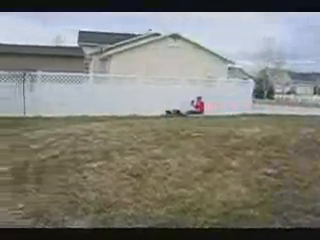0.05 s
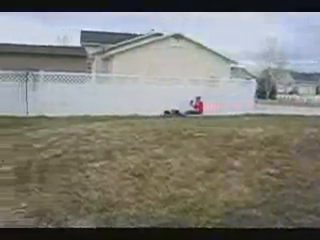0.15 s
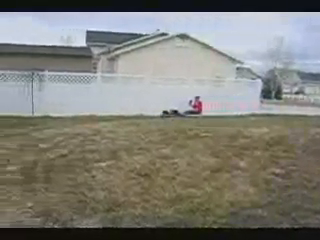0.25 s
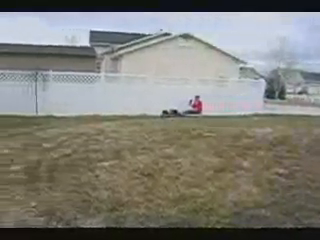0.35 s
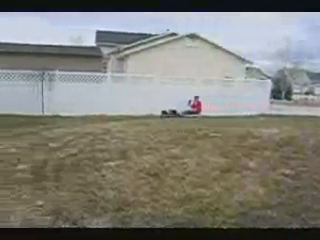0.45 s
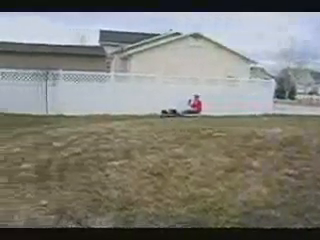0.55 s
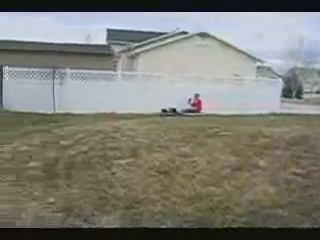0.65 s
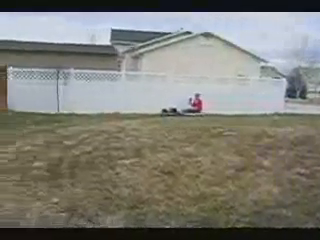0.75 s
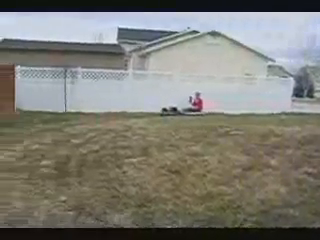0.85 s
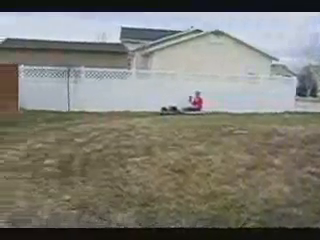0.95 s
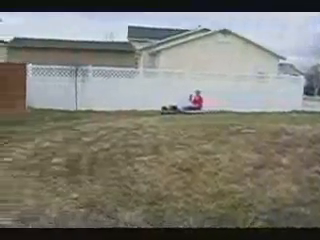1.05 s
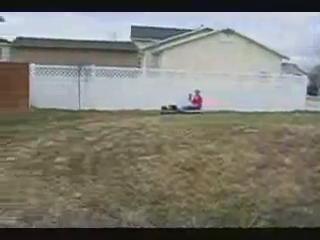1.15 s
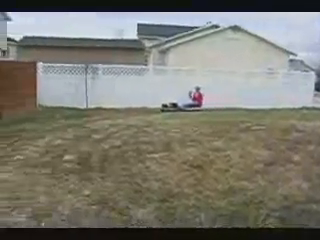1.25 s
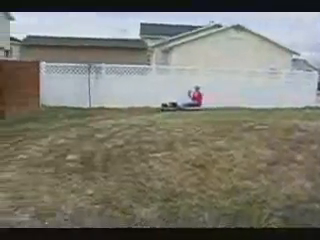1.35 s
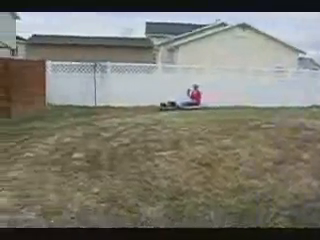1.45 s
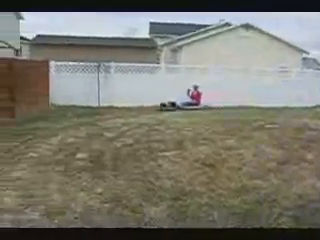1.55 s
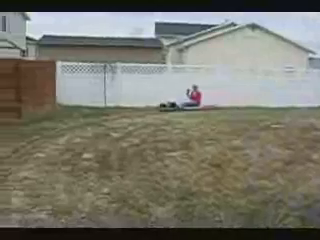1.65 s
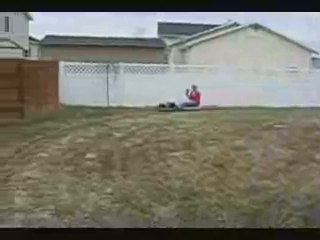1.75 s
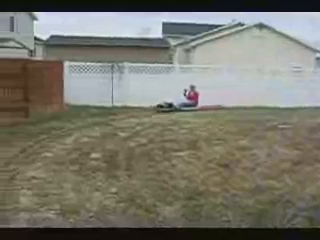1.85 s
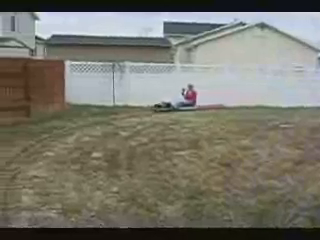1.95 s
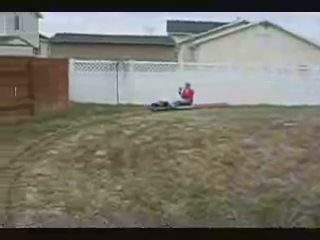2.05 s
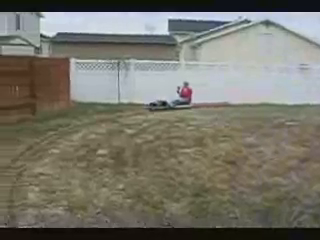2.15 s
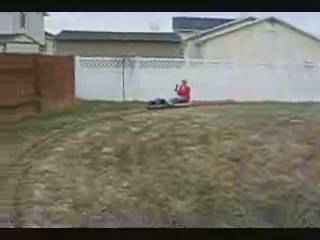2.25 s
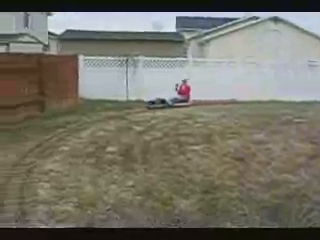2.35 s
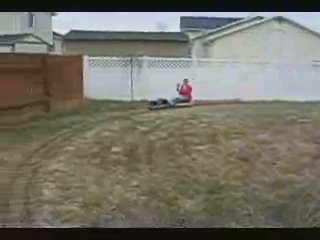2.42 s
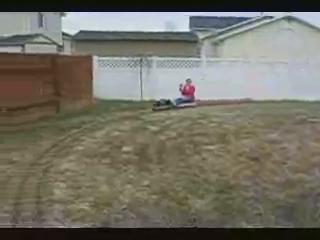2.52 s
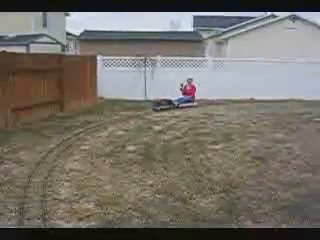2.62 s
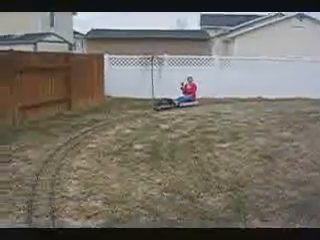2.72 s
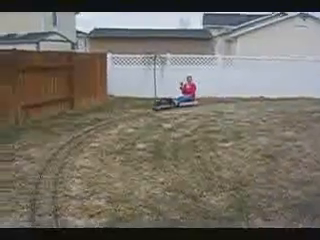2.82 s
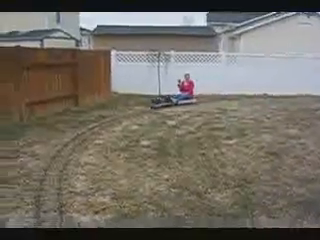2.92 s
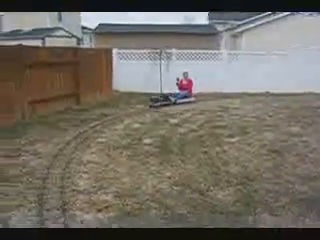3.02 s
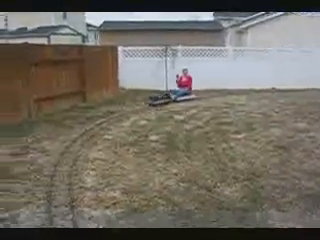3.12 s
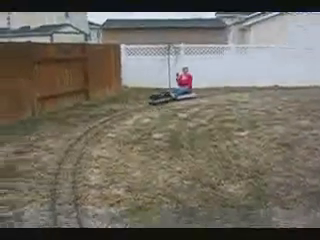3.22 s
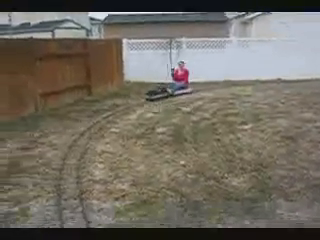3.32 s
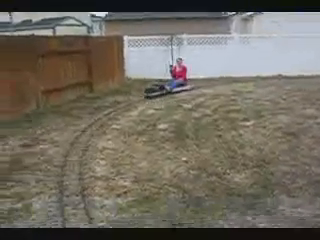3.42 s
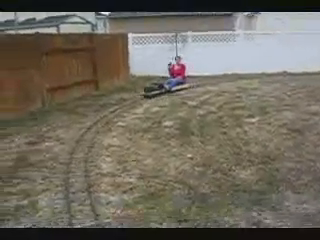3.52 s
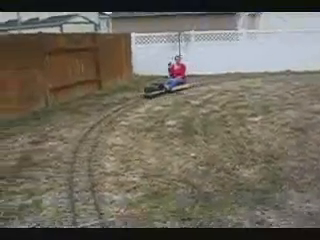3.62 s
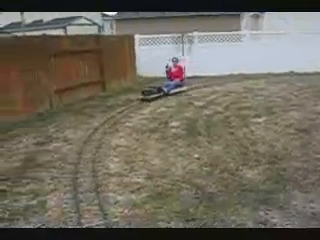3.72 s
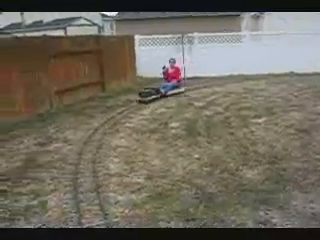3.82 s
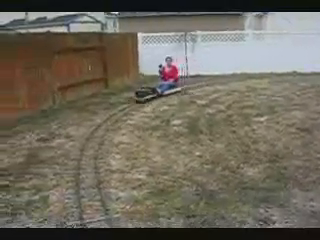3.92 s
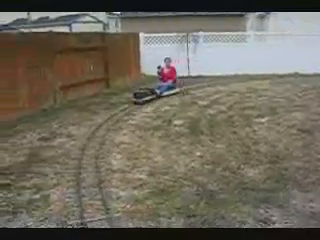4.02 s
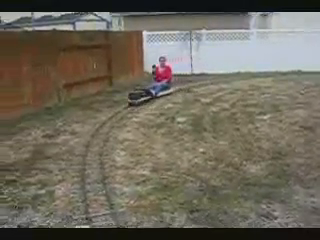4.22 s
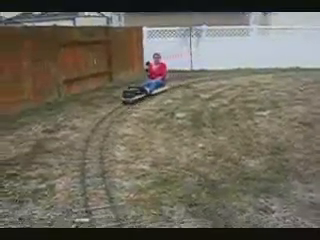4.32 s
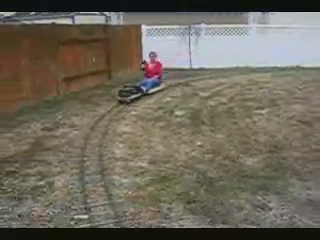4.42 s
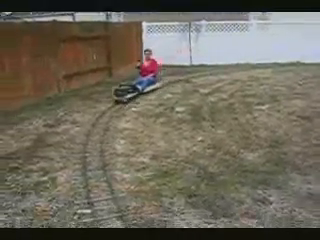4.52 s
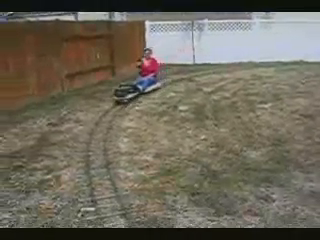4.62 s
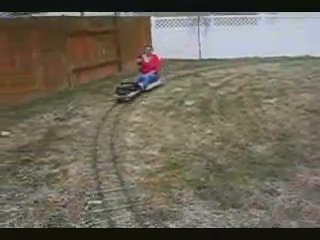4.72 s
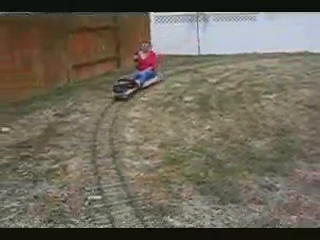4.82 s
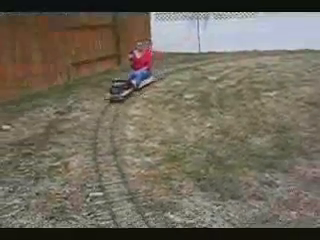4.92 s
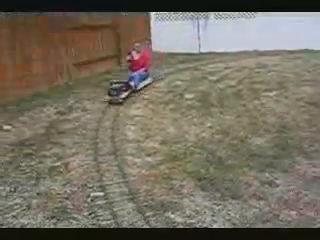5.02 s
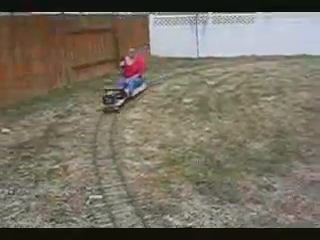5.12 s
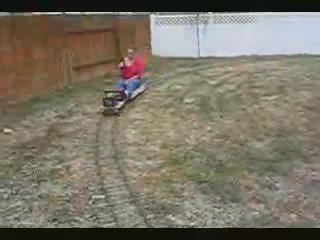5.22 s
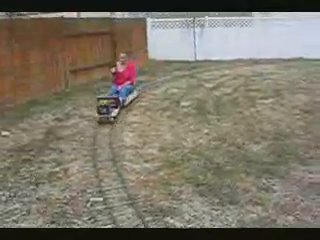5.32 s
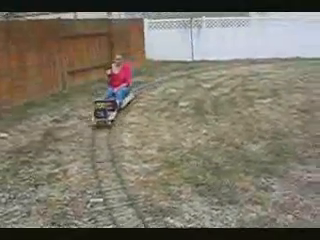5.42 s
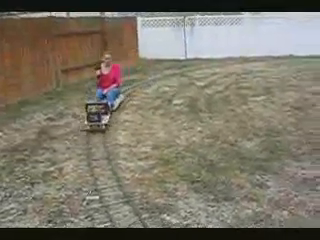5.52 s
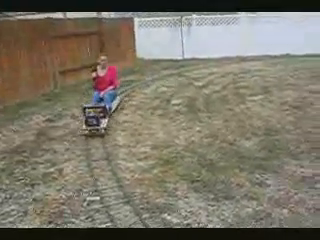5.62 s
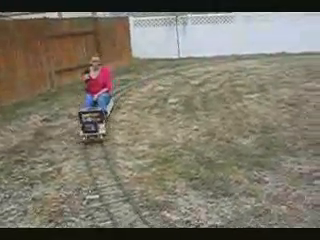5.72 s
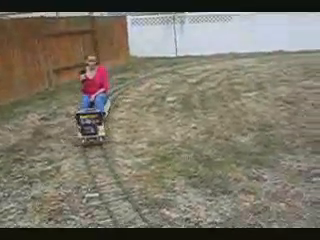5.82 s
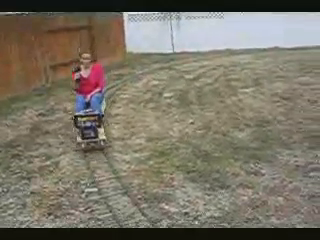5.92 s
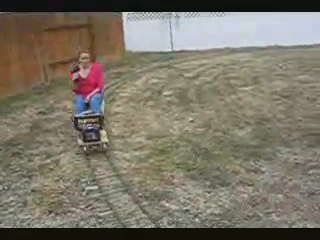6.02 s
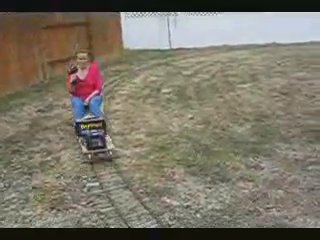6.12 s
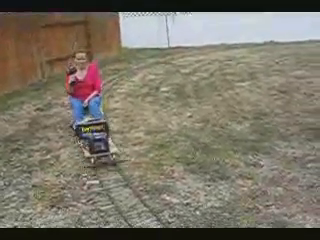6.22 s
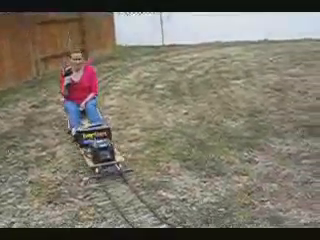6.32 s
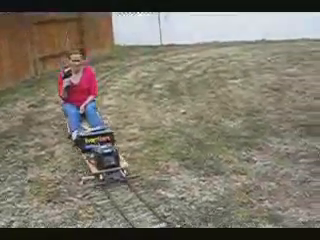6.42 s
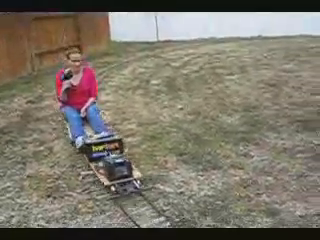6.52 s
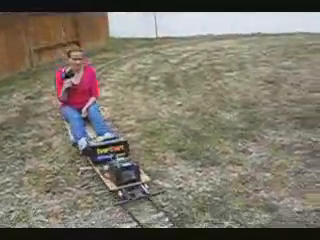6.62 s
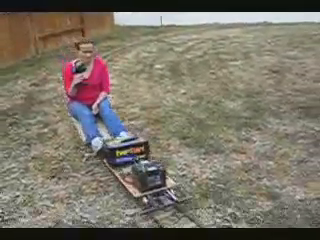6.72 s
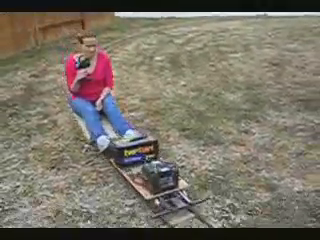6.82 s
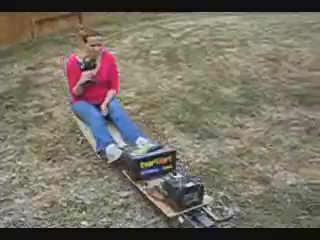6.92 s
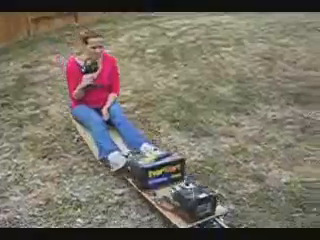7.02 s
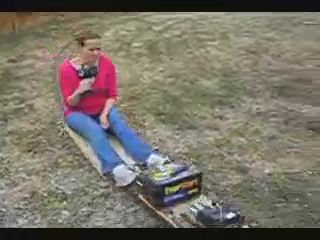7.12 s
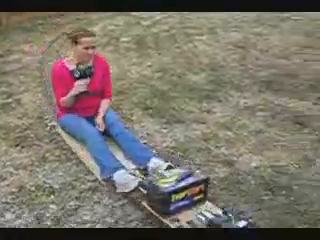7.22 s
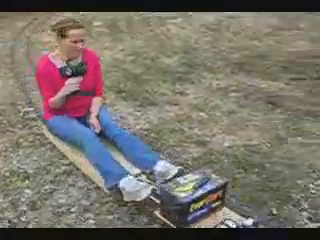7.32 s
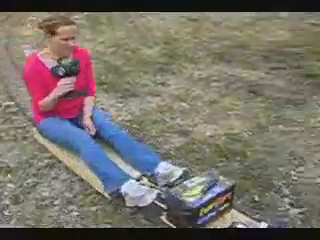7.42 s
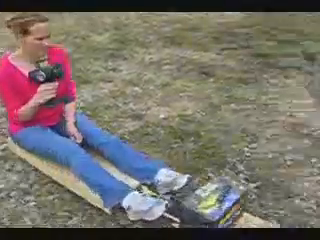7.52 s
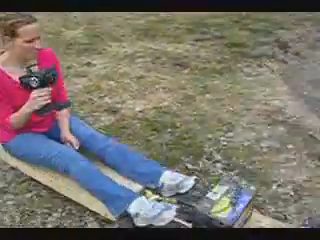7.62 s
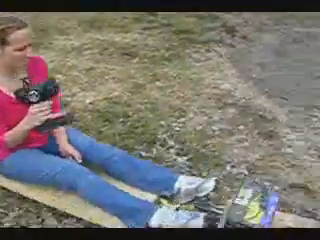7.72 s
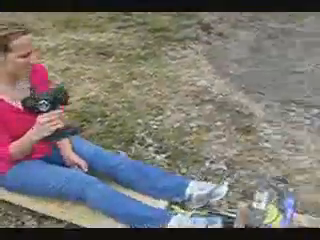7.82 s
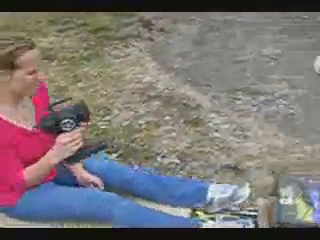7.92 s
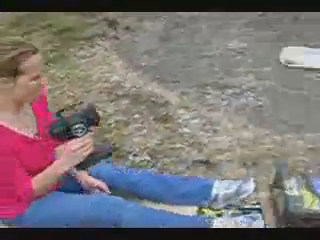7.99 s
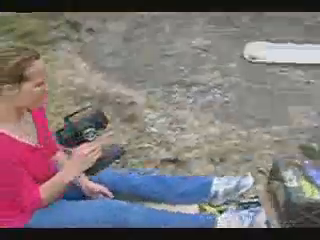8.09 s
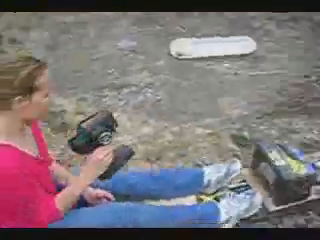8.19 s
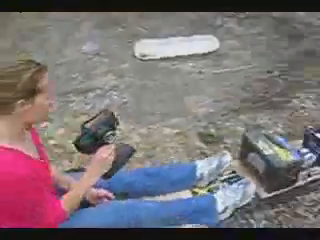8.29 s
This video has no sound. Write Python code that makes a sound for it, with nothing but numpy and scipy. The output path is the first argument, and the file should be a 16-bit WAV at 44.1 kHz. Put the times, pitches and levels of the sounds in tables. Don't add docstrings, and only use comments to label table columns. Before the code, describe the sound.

Wheels hiss faintly over a distant engine hum, then a little battery rail car grows loud, whining and knocking, passing close beside a cheap microphone.

```python
import sys
import numpy as np
from scipy import signal
from scipy.fft import rfft, irfft
from scipy.io import wavfile
from scipy.ndimage import uniform_filter1d

SR = 44100
rng = np.random.default_rng(int(sys.argv[2]) if len(sys.argv) > 2 else 0)


def output_pcm(signal):
    pcm = np.clip(np.atleast_2d(signal).T, -1, 1) * 32767
    wavfile.write(sys.argv[1], SR, np.round(pcm).astype(np.int16))


def gain_from_db(level_db):
    decades = np.asarray(level_db, float) / 20
    return 10 ** decades


N = 368235

# time_s, rolling_db, rail_load_db, side_on_0_to_1
PASS = [(0, -37, 5, 0.05), (.4, -35, 0.5, 0.03), (.85, -34.5, 3.5, 0.05), (1.6, -34.5, 8, 0.06),
        (2.4, -33, 5.5, 0.02), (3, -32, 5, 0), (4.2, -31.5, 2.5, 0.01), (4.9, -29.5, 2, 0.12),
        (5.3, -27.5, 1.5, 0), (5.8, -25.5, -1, 0.14), (6.3, -23.5, 5.5, 0.01), (6.8, -23.5, 7, 0),
        (7.1, -20, 6, 0.08), (7.55, -20.5, -2, 0.24), (7.72, -24, 3.5, 0.49), (8, -23, 5.5, 0.6),
        (8.2, -25, 3.5, 0.99), (8.35, -25, 4.5, 1)]
# time_s, gain_db, half_length_s
RAIL_LUMPS = [(0.87, 3.5, 0.054), (1.502, 1.5, 0.054), (1.84, 1.5, 0.031), (3.737, 5.5, 0.019),
              (5.296, 1.5, 0.055), (6.333, 1.5, 0.038), (6.563, 1, 0.066), (6.743, 2, 0.044),
              (6.789, -4.5, 0.016), (7.029, -7, 0.0066), (7.039, 2, .01), (7.072, -1, 0.01),
              (7.099, 2.5, .012), (7.114, -2.5, .008), (7.201, -4, .01), (7.342, -1, .01),
              (7.611, 3.5, 0.032), (7.653, -3, 0.028), (7.835, 4, 0.017), (7.859, 0.5, 0.011),
              (7.92, -3, 0.041), (8.031, -1, .02), (8.114, -3.5, 0.013), (8.216, -0.5, .02),
              (8.09, 5, 0.022), (8.145, 2, 0.037), (8.267, 2, 0.048), (8.336, -1.5, 0.013)]
# freq_hz, density_db
HISS_FAR = [(530, -21), (900, -23), (933, 1.5), (1310, 2), (1560, -0.5), (1750, 1), (1880, 0.5),
            (2270, -0.5), (2760, -12), (3150, -9.5), (3740, -18), (4720, -27), (5070, -42), (6590, -62.5),
            (11200, -120)]
# freq_hz, density_db
HISS_NEAR = [(530, -34.5), (900, 1.5), (1000, -12.5), (1180, 1), (1320, -3), (1430, -6.5), (1790, -12.5),
             (2160, -12), (2500, -18.5), (3360, -17.5), (3800, -38.5), (4520, -34), (5070, -40),
             (6590, -71.5), (11200, -120)]
# freq_hz, density_db
DECK_BOOM = [(53, -58.5), (90, -26), (199, -20), (274, -3.5), (373, -2), (424, -7), (445, -11), (471, -3),
             (503, -4.5), (620, -2.5), (810, -38), (1360, -120)]
# time_s, mesh_hz
GEAR_MESH = [(0, 470), (.8, 470), (1.5, 456), (2.5, 450), (3.6, 440), (4.4, 436), (5.3, 431), (5.7, 425),
             (6.3, 426), (6.9, 432), (7.2, 442), (7.6, 449), (7.9, 452), (8.35, 420)]
# start_s, length_s, mesh_tone_db, whine_db
GEAR_BITES = [(0.738, 0.26, -50, -30), (1.13, 0.2, -49, -32), (1.384, 0.18, -35.5, -33),
              (1.876, 0.4, -37.5, -40.5), (2.31, 0.17, -38.5, -46), (2.576, 0.12, -36.5, -44),
              (2.863, .14, -32.5, -44), (3.198, .15, -33, -52), (3.559, 0.34, -34, -33),
              (4.222, 0.39, -31.5, -31.5), (4.999, 0.53, -32, -36), (5.203, 0.47, -40, -28.5),
              (5.674, 0.28, -32.5, -27.5), (5.854, 0.22, -27.5, -19), (6.221, 0.27, -27.5, -19),
              (6.52, 0.35, -25.5, -20), (6.888, 0.16, -27, -16), (7.04, .074, -30, -9.5),
              (7.127, .075, -25, -16), (7.165, 0.23, -19, -15), (7.391, .1, -32, -15.5),
              (7.428, .04, -14.5, -22.5), (7.5, 0.091, -17, -24), (7.601, 0.045, -17.5, -24),
              (7.674, 0.087, -17, -27), (7.819, 0.19, -20.5, -23.5), (7.926, 0.13, -18.5, -16.5),
              (8.125, 0.2, -29.5, -18.5)]
# start_s, peak_db, knock_hz, knock_share, t60_s
JOINTS = [(0.1864, -13, 256, 0.3, 0.086), (2.4102, -16, 660, 0.35, 0.17), (4.2931, -17, 856, 0.85, 0.071),
          (5.0409, -10, 767, 0.27, 0.17), (5.052, -11, 700, .4, 0.1), (5.0674, -8, 850, 0.19, 0.092),
          (6.958, -15.5, 937, .9, 0.056), (7.011, -10.5, 888, .9, 0.066), (7.038, -9, 872, .2, 0.054),
          (7.127, -11.5, 740, .8, 0.053), (7.171, -15.5, 965, 0.82, 0.064), (7.265, -10, 950, .9, 0.072),
          (7.355, -11, 922, 1, 0.097), (7.456, -18, 890, 0.92, 0.053), (7.55, -14, 907, .8, .07),
          (5.206, -9.5, 802, 0.57, 0.1), (6.54, -11, 877, 0.96, 0.2), (7.06, -14, 1039, 0.9, 0.15),
          (7.3, -10.5, 1241, 1, 0.14), (7.239, -11.5, 915, 0.6, 0.065), (7.408, -13, 898, 1, 0.07),
          (7.606, -20.5, 443, 0.61, 0.067), (7.6229, 1.5, 455, 0.91, 0.028), (7.707, -5.5, 414, 1, 0.04),
          (7.734, -16, 450, 0.71, 0.031), (7.817, -10.5, 580, 0.9, 0.077), (7.834, -7.5, 530, 1, 0.045),
          (7.879, -4.5, 474, 0.96, 0.042), (7.958, -8, 387, 1, 0.087), (8.0591, -7.5, 527, 0.34, 0.11),
          (8.103, -11, 392, 1, 0.072), (8.153, -9.5, 253, 0.87, 0.081), (8.205, -9.5, 593, 0.88, 0.06),
          (8.245, -5.5, 775, 0.95, 0.076), (8.2706, -5.5, 345, 0.59, 0.03), (8.316, -7.5, 322, 0.61, 0.036)]
# start_s, peak_db
RATTLES = [(0.377, -32), (2.6394, -34), (2.6529, -31), (2.7207, -27), (2.76, -25), (2.835, -24.5),
           (2.864, -29), (2.891, -32), (2.924, -23), (2.9472, -25), (2.9744, -30), (3.9818, -29.5),
           (4.9861, -32), (5.039, -24), (5.0693, -20), (5.0864, -20.5), (5.2836, -31), (5.722, -23),
           (5.941, -26.5), (6.0826, -26.5), (6.3113, -34), (6.593, -21.5), (6.793, -21), (6.981, -28),
           (7.3178, -28), (7.41, -31), (7.533, -22), (7.7044, -32), (7.8187, -25), (7.976, -28.5),
           (8.069, -28.5), (8.25, -28), (8.316, -33.5), (7.8765, -21.5), (7.6235, -29.5)]
# time_s, pitch_hz, level_db
ENGINE_HUM = [(0, 69.4, -44.5), (1.97, 69, -47), (2.1, 66, -58), (2.7, 66, -55), (2.9, 70, -59),
              (3.05, 59.3, -63.5), (4.4, 58, -49), (4.55, 58.7, -51), (4.62, 60, -76), (4.7, 97.5, -82),
              (5, 105, -64), (5.8, 105, -60.5), (6.1, 95.7, -73.5), (6.35, 93, -49.5), (6.7, 94, -58),
              (7.3, 88, -60), (7.6, 92, -57), (8.35, 90, -58)]
# freq_hz, density_db
AIR = [(12, -38), (20, -14.5), (32, -36), (54, -30.5), (71, -16), (92, -17), (184, -11), (300, -9),
       (390, -32), (660, -120)]
# time_s, level_db
AIR_THUMPS = [
    (2.72, -47.5),
    (4.95, -50),
    (6.22, -51),
    (7.47, -51),
    (8.07, -58),
]
# time_s, peak_db, rolloff_hz, top_hz
OVERLOAD_TICKS = [(6.5824, -61, 7000, 12300), (7.0113, -48, 6000, 15700), (7.0409, -55, 7100, 12200),
                  (7.1456, -40, 5500, 15600), (7.3596, -48.5, 9000, 16000), (7.3697, -42, 5550, 12300),
                  (7.3848, -45, 5500, 12300), (7.6247, -29.5, 4800, 12300), (7.645, -51, 7120, 12300),
                  (7.6548, -50, 4540, 9500), (7.8784, -40, 7500, 15800), (8.277, -50, 5500, 14900)]
# freq_hz, density_db
TICK_HALO = [(4800, -43), (5500, 2), (7000, -9.5), (12000, -15.5), (12600, -64.5)]
# freq_hz, density_db
GRIT = [(4500, -36.5), (5200, 1), (6000, -14.5), (7000, -5.5), (11000, -3.5), (12100, 1.5), (12500, -6.5),
        (12900, -59)]
# freq_hz, gain_db
MIRROR = [(5400, -81.5), (6000, -37), (7000, -14), (8000, -13), (9000, -14.5), (10100, -6), (11000, 3),
          (12000, 1.5), (12400, -6.5), (12900, -78.5)]


def wheels():
    facing_s, facing_half_s, facing_db = 5.4, 0.94, 4.5
    hz = np.fft.rfftfreq(512, 1 / SR)[:, None]
    level_db, _, side = curves(PASS, step=128)
    near = nearness(level_db)
    shape_db = (1 - near) * read(HISS_FAR, hz) + near * read(HISS_NEAR, hz)
    top_db = 1.5 - 6.5 * near - 9 * np.sqrt(side)
    frame_s = np.arange(len(near)) * 128 / SR
    top_db = top_db + facing_db * np.exp(-((frame_s - facing_s) / facing_half_s) ** 2)
    shape_db = shape_db + top_db * np.clip((hz - 2500) / 1000, 0, 1)
    return gain_from_db(curves(PASS)[0] + 2) * noise(shape_db, patchy_db=0.93, flicker_db=1.06)


def rails():
    far_hz, climb_hz, side_drop = 643, 370, 0.43
    level_db, load_db, side = curves(PASS)
    hz = (far_hz + climb_hz * nearness(level_db)) * (1 - side_drop * side)
    rolling = noise(np.zeros((257, 1)), patchy_db=0.7, flicker_db=0.3)
    wide = resonate(resonate(rolling, hz, 870), hz, 420)
    narrow = resonate(wide, hz, 300)
    spread = 0.94 * side
    ring = np.sqrt(1 - spread) * evened(narrow) + np.sqrt(spread) * evened(wide)
    return gain_from_db(level_db + load_db - 2.5 + 1.2 * side * wander(12)) * ring


def deck():
    deck_db, side_db = -6, 13
    panel_from_s, panel_to_s, panel_hz, panel_db = 3.2, 5.2, 362, -42
    level_db, _, side = curves(PASS)
    lumps_db = 1.3 * evened(uniform_filter1d(rng.standard_normal(N), size=2000))
    braced_db = -15 * bell(4.47, 0.37) - 2 * bell(5.84, 0.23)
    boom = gain_from_db(level_db + deck_db + side_db * side + braced_db + lumps_db) * coloured(DECK_BOOM)
    t = np.arange(N) / SR
    sings = (t > panel_from_s) & (t < panel_to_s)
    sings = uniform_filter1d(sings * 1.0, size=8000)
    panel = resonate(resonate(rng.standard_normal(N), panel_hz, 30), panel_hz, 30)
    return boom + gain_from_db(panel_db) * sings * evened(panel)


def gears():
    slack_db, slack_whine_db = -10, -8
    edge_s, whine_ratio, pure_share = 0.02, 2.015, 0.7
    t, rolling = np.arange(N) / SR, gain_from_db(curves(PASS)[0])
    load = np.array([gain_from_db(slack_db) * rolling, gain_from_db(slack_whine_db) * rolling])
    for s, length_s, *db in GEAR_BITES:
        inside_s = np.minimum(t - s, s + length_s - t)
        load = np.maximum(load, gain_from_db(db)[:, None] * np.clip(inside_s / edge_s + 0.5, 0, 1))

    mesh_hz = curves(GEAR_MESH)[0]
    rough = np.interp(t, [1, 3.6, 7.7, 8], [0.6, 0.25, 0.1, 1])
    fuzz = resonate(resonate(rng.standard_normal(N), mesh_hz, 69), mesh_hz, 69)
    tone = (0.85 - 0.5 * rough) * np.sqrt(2) * sine(mesh_hz)
    tone = tone + (0.32 + 0.5 * rough) * evened(fuzz)

    whine_hz = whine_ratio * mesh_hz
    buzz = rng.standard_normal(N)
    narrow = evened(resonate(resonate(buzz, whine_hz, 28), whine_hz, 28))
    broad = evened(resonate(resonate(buzz, whine_hz, 140), whine_hz, 140))
    sharp = pure_share * np.sqrt(2) * sine(whine_hz) + np.sqrt(1 - pure_share ** 2) * narrow
    blur = np.interp(t, [4.8, 5.798, 7.6, 7.8], [1, 0.12, 0.12, 1])
    whine = np.sqrt(1 - blur) * sharp + np.sqrt(blur) * broad
    return load[0] * gain_from_db(1.2 * wander(14)) * tone + load[1] * gain_from_db(-5.5) * whine


def rims():
    from_s, far_hz, climb_hz, rim_db, fade_db = 4.6, 1925, 292, -8.5, -13
    level_db = curves(PASS)[0]
    hz = far_hz + climb_hz * nearness(level_db)
    since_s = np.arange(N) / SR - from_s
    dip_db = fade_db * np.exp(-((since_s - 1.7) / 0.5) ** 2)
    ring = evened(resonate(resonate(rng.standard_normal(N), hz, 190), hz, 190))
    return np.clip(since_s / 0.16, 0, 1) * gain_from_db(level_db + rim_db + dip_db + wander(6.6)) * ring


def joints():
    out, t = np.zeros(N), np.arange(4000) / SR
    bright = signal.butter(3, [900, 2700], "band", fs=SR)
    for s, db, hz, knock_share, t60_s in JOINTS:
        hiss = evened(signal.lfilter(*bright, rng.standard_normal(4000)))
        blow = 0.22 * hiss + knock_share * np.sin(2 * np.pi * hz * t)
        envelope = gain_from_db(db - 0.5 - 60 * t / t60_s) * np.minimum(t / 0.0021, 1)
        part = out[round(s * SR):][:4000]
        part += (envelope * blow)[:len(part)]
    return out


def rattles():
    t60_s, trim_db = 0.03, -8
    out, t = np.zeros(N + 1000), np.arange(1000) / SR
    band = signal.butter(3, [2600, 4200], "band", fs=SR)
    for s, db in RATTLES:
        snap = evened(signal.lfilter(*band, rng.standard_normal(1000)))
        envelope = gain_from_db(db + trim_db - 60 * t / t60_s) * np.minimum(t / 0.0045, 1)
        out[round(s * SR):][:1000] += envelope * snap
    return out[:N]


def yard():
    thump_hz, thump_half_s = 66, 0.056
    air_db, calm_from_s, calm_db = -45.5, 5.3, -6.5
    t = np.arange(N) / SR
    hum_hz, hum_db = curves(ENGINE_HUM)
    drone = gain_from_db(hum_db + np.clip(t - 1.8, 0.3, 1) * 2.2 * wander(6)) * sine(hum_hz)
    bumps = sum(gain_from_db(db) * bell(s, thump_half_s) for s, db in AIR_THUMPS)
    bumps = bumps * np.sin(2 * np.pi * thump_hz * t)
    air = coloured(AIR)
    deep = signal.sosfiltfilt(signal.butter(3, 85, fs=SR, output="sos"), air)
    calm = (1 - gain_from_db(calm_db)) * np.clip((t - calm_from_s) / 0.2, 0, 1)
    return np.sqrt(2) * (drone + bumps) + gain_from_db(air_db - 0.5) * (air - calm * deep)


def mirror(x):
    folded = np.diff(x, 2, prepend=[0, 0]) * np.cos(np.pi / 2 * np.arange(N))
    weight = gain_from_db(read(MIRROR, np.fft.rfftfreq(N, 1 / SR)))
    return gain_from_db(-79.5) * evened(irfft(rfft(folded) * weight, N))


def evened(x):
    return x / np.sqrt(np.mean(x ** 2) + 1e-20)


def read(points, hz):
    f, value = np.transpose(points)
    return np.interp(np.log(hz + 1), np.log(f + 1), value)


def curves(rows, step=1):
    s, *columns = np.transpose(rows)
    count = N // step + 5 * (step > 1)
    return [np.interp(np.arange(count) * step / SR, s, c) for c in columns]


def noise(shape_db, patchy_db, flicker_db):
    frames = N // 128 + 5
    a, b, patches = rng.standard_normal((frames, 257, 3)).T
    patches = uniform_filter1d(patches, size=5, axis=0)
    patches = evened(uniform_filter1d(patches, size=16, axis=1))
    flicker = evened(uniform_filter1d(rng.standard_normal(frames), size=10))
    gain = gain_from_db(shape_db * np.ones((257, frames)))
    gain = gain / np.linalg.norm(gain, axis=0)
    gain = gain * gain_from_db(patchy_db * patches + flicker_db * flicker)
    return evened(signal.istft((a + 1j * b) * gain, nperseg=512, noverlap=384)[1][:N])


def coloured(points):
    gain = gain_from_db(read(points, np.fft.rfftfreq(N, 1 / SR)))
    return evened(irfft(rfft(rng.standard_normal(N)) * gain, N))


def resonate(x, hz, width_hz):
    turn = np.exp(2j * np.pi * np.cumsum(hz * np.ones(len(x))) / SR)
    r = np.exp(-np.pi * width_hz / SR)
    return 2 * (turn * signal.lfilter([1 - r], [1, -r], x / turn)).real


def sine(hz):
    return np.sin(2 * np.pi * np.cumsum(hz) / SR)


def wander(rate_hz):
    t = np.arange(0, N + 256, 256) / SR
    freqs_hz = np.geomspace(0.1, 1, num=20) * rate_hz
    weights = np.geomspace(0.1, 1, num=20) * rate_hz
    waves = sum(np.sin(2 * np.pi * (f * t + rng.random())) / (w / rate_hz) ** 0.6
                for f, w in zip(freqs_hz, weights))
    return np.interp(np.arange(N) / SR, t, evened(waves))


def nearness(level_db):
    far_db, near_db = -37.5, -9.5
    return np.clip((level_db - far_db) / (near_db - far_db), 0, 1)


def bell(s, half_s):
    return np.exp(-((np.arange(N) / SR - s) / half_s) ** 2)


def scene():
    t = np.arange(0, N + 64, 64) / SR
    lumps_db = sum(db * np.exp(-((t - s) / half_s) ** 2) for s, db, half_s in RAIL_LUMPS)
    lumps = gain_from_db(np.interp(np.arange(N) / SR, t, lumps_db))
    car = lumps ** 0.21 * wheels() + lumps * (rails() + deck()) + lumps ** 0.54 * gears()
    car = car + rims() + joints() + rattles()
    car = signal.sosfilt(signal.butter(4, 135, "high", fs=SR, output="sos"), car)
    return (car + yard())[None]


def roll_off(x):
    return signal.sosfilt(signal.butter(12, 15800, fs=SR, output="sos"), x)


def record(dry):
    knee, ceiling, offset, grit_db = 0.5, 0.72, -0.0555, -56
    over, room = np.maximum(abs(dry) - knee, 0), ceiling - knee
    x = dry - np.sign(dry) * (over - room * np.tanh(over / room))
    lowpass = signal.firwin(301, 5180, window=("kaiser", 10), fs=SR)
    x = signal.oaconvolve(x, lowpass[None], "same")

    level = np.sqrt(abs(uniform_filter1d(x ** 2, size=1500)))
    grit_shape_db = read(GRIT, np.fft.rfftfreq(512, 1 / SR))[:, None]
    grit = level * noise(grit_shape_db, patchy_db=3.5, flicker_db=0.6)
    x = x + gain_from_db(grit_db) * grit + mirror(x[0])

    t = np.arange(64) / SR
    halo = signal.windows.hann(5000) * coloured(TICK_HALO)[:5000]
    for s, db, rolloff_hz, top_hz in OVERLOAD_TICKS:
        i = round(s * SR)
        tick = np.diff(np.exp(-0.5 * ((t - t.mean()) * 2 * np.pi * rolloff_hz) ** 2))
        tick = np.convolve(tick, signal.firwin(63, top_hz, fs=SR), "same")
        x[0, i:][:63] += gain_from_db(db + 11.5) * tick
        x[0, i - 2500:][:5000] += (gain_from_db(db - 32.5) * halo)[:N + 2500 - i]
    x = x + offset
    return roll_off(x)


dry = scene()
out = record(dry)
output_pcm(out)
```